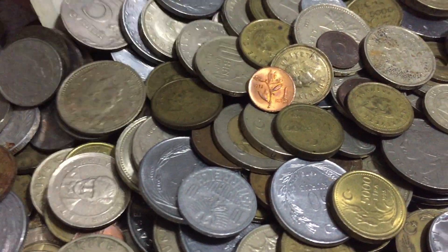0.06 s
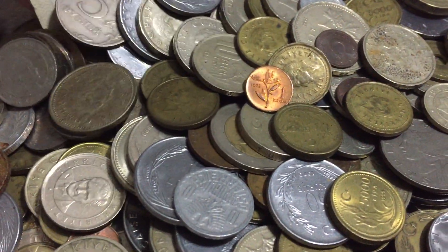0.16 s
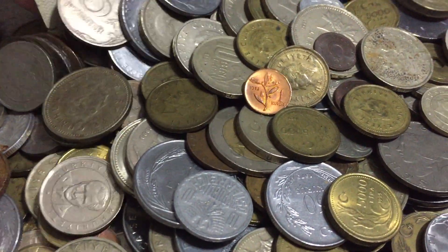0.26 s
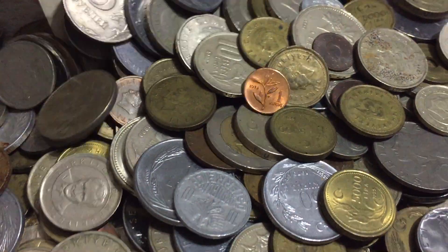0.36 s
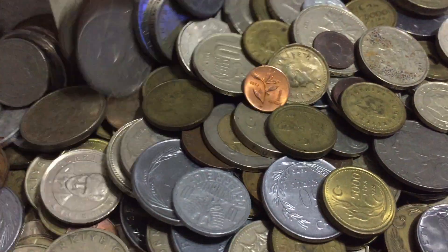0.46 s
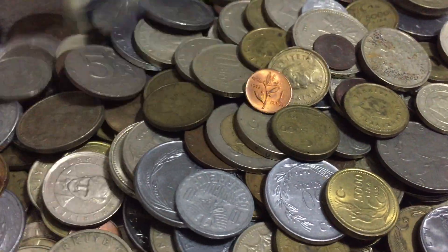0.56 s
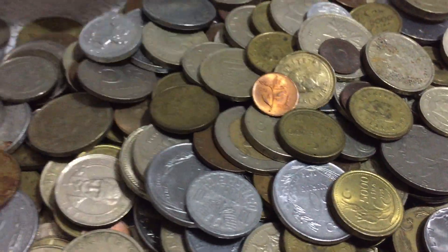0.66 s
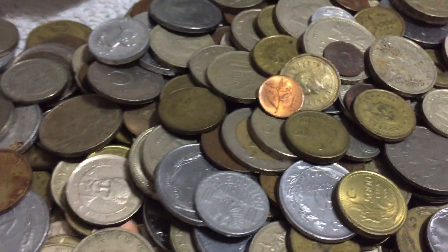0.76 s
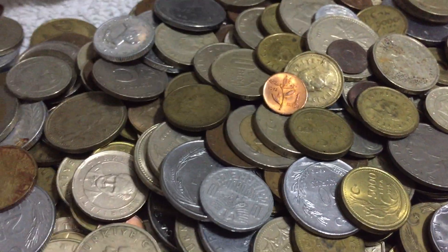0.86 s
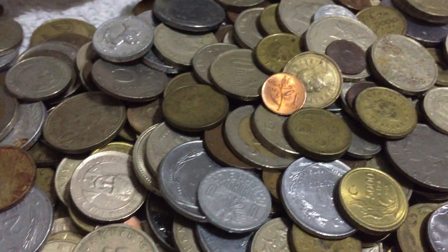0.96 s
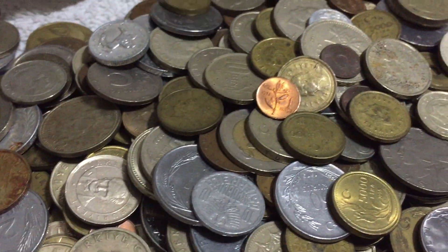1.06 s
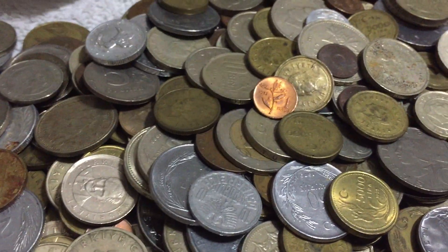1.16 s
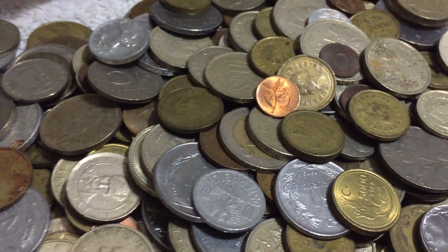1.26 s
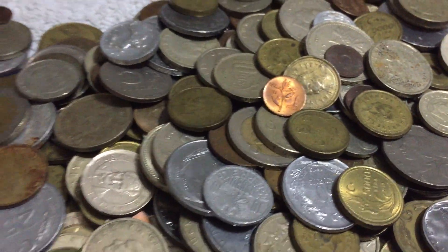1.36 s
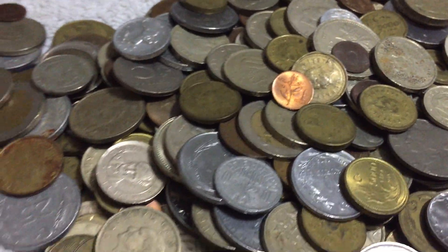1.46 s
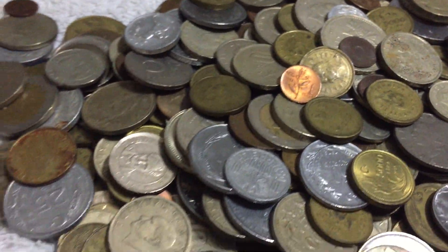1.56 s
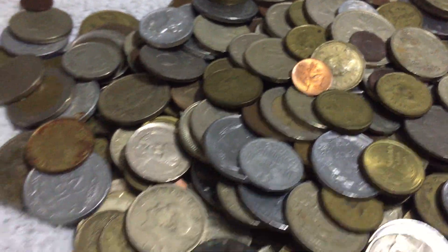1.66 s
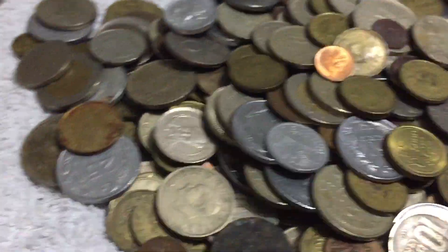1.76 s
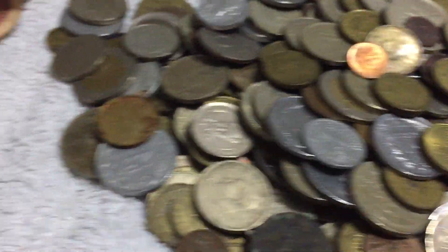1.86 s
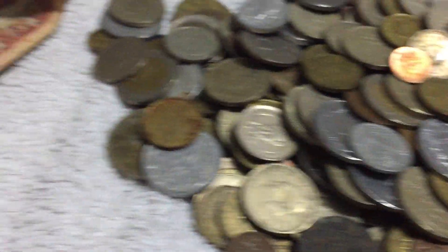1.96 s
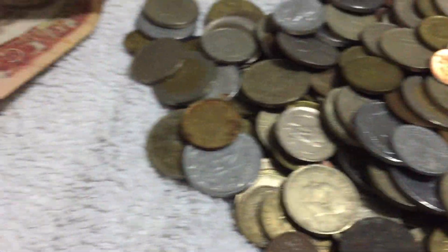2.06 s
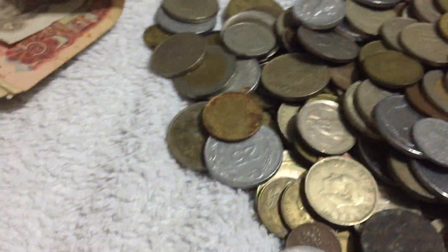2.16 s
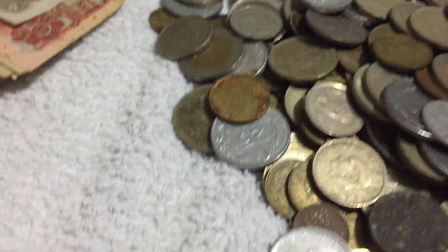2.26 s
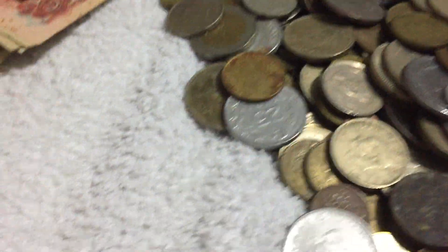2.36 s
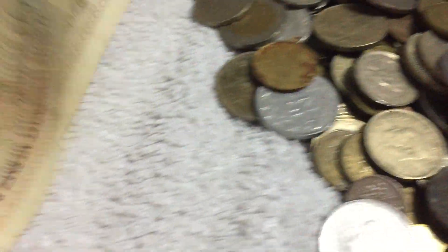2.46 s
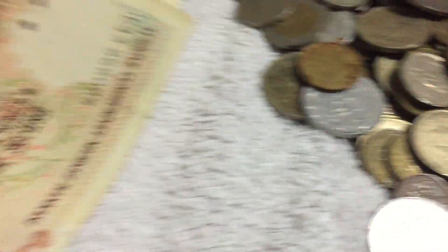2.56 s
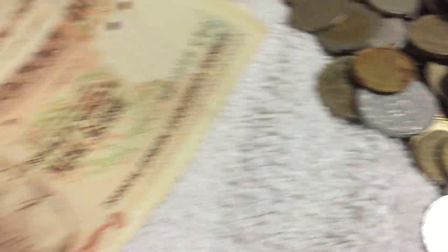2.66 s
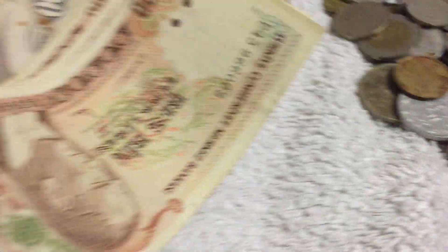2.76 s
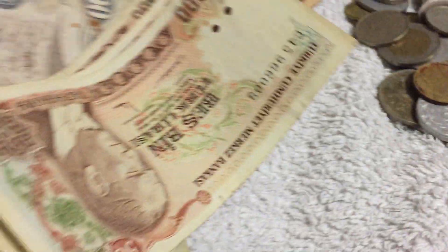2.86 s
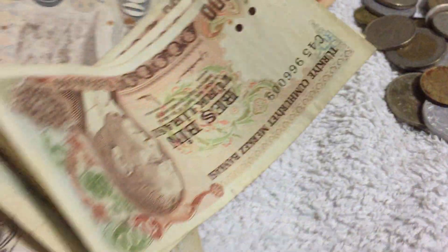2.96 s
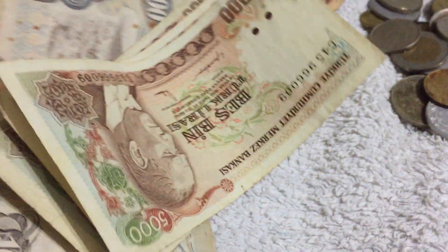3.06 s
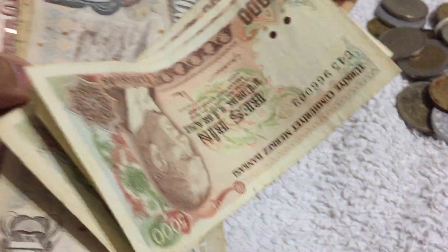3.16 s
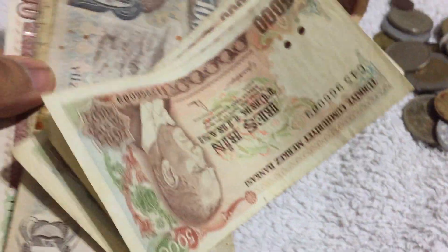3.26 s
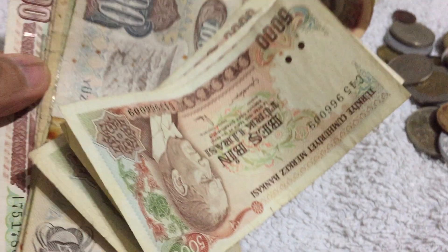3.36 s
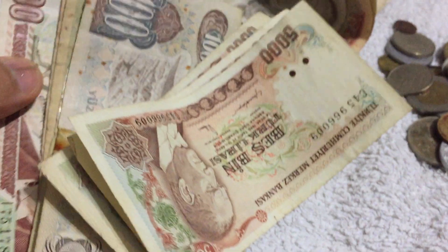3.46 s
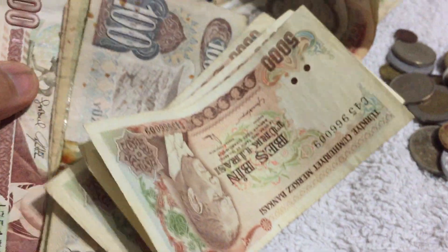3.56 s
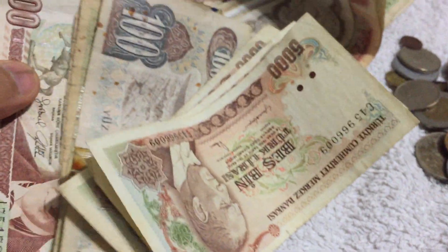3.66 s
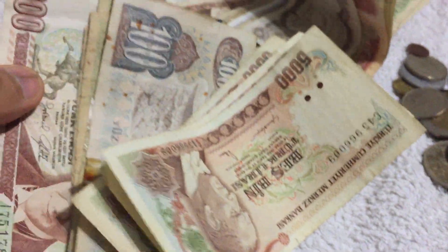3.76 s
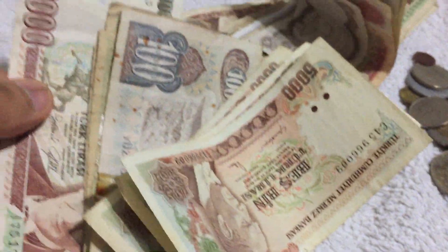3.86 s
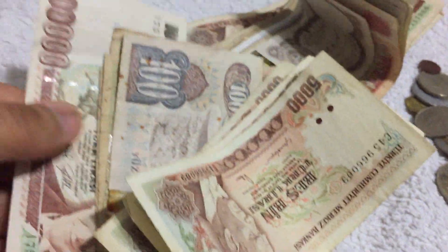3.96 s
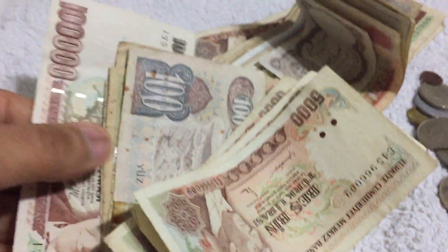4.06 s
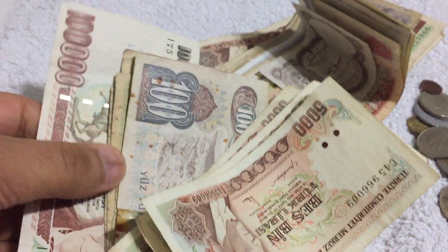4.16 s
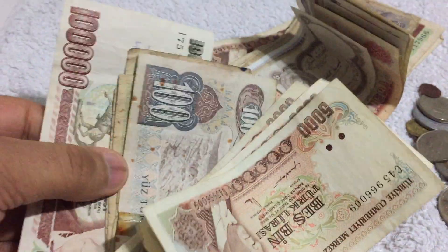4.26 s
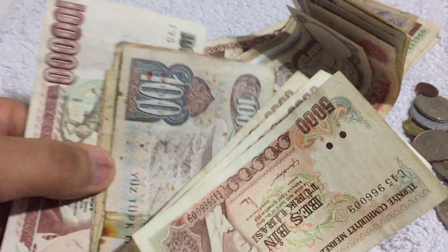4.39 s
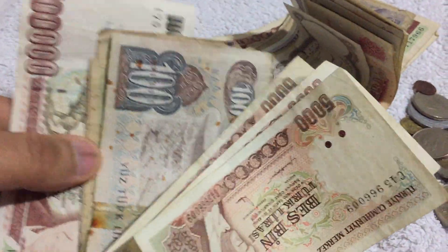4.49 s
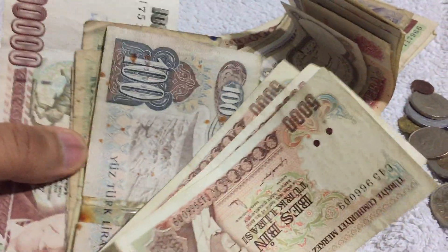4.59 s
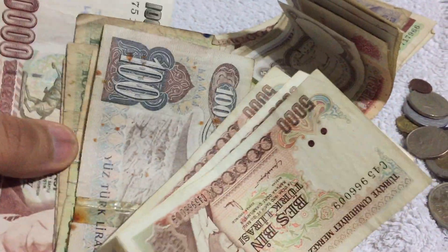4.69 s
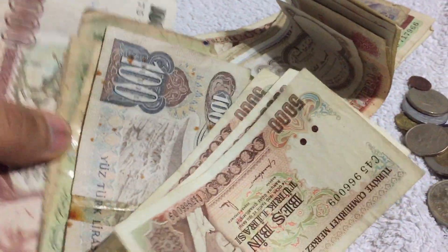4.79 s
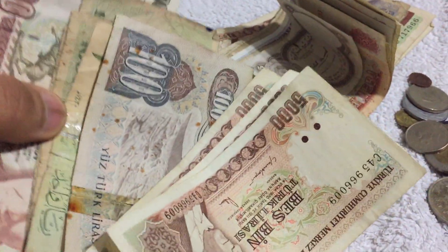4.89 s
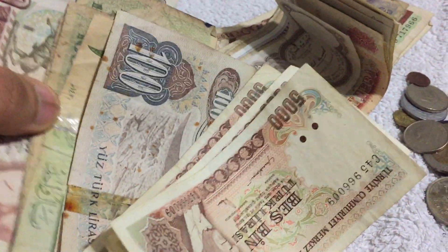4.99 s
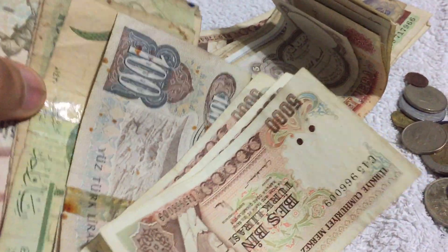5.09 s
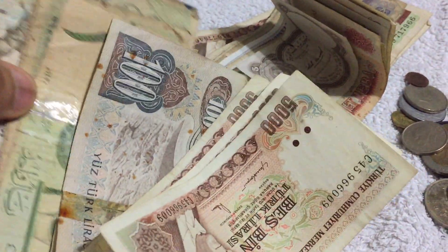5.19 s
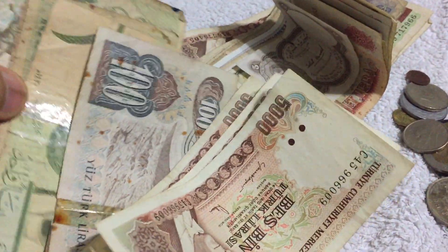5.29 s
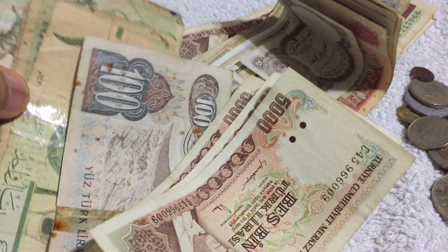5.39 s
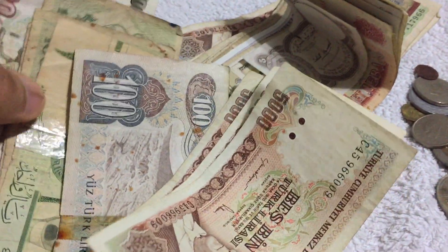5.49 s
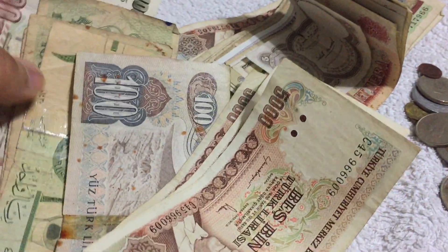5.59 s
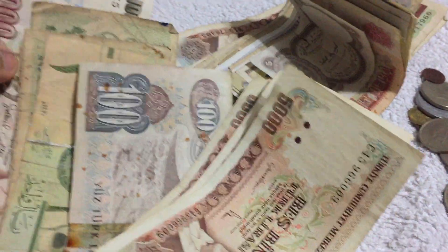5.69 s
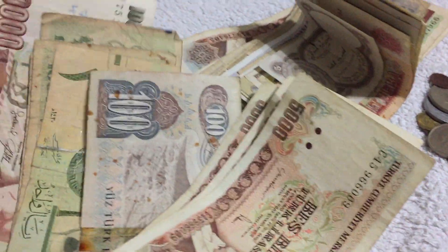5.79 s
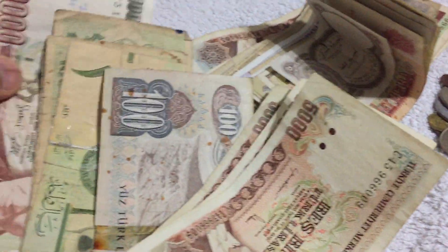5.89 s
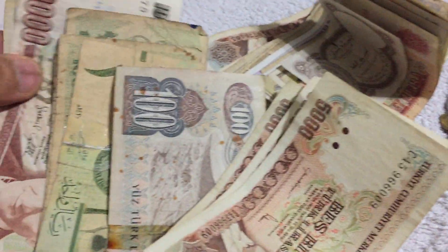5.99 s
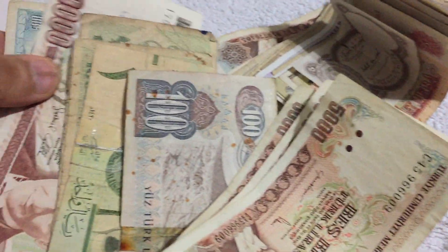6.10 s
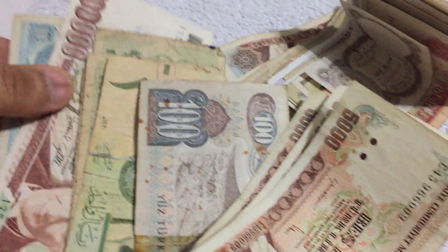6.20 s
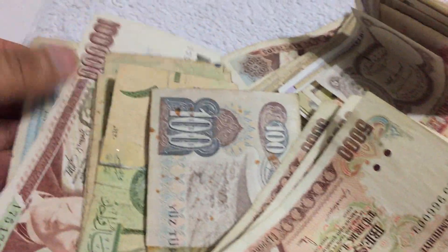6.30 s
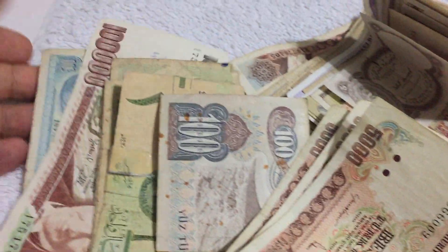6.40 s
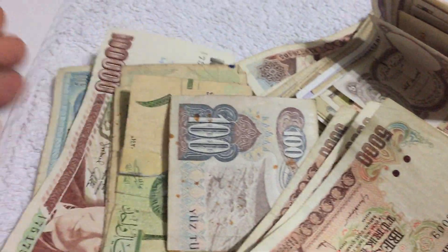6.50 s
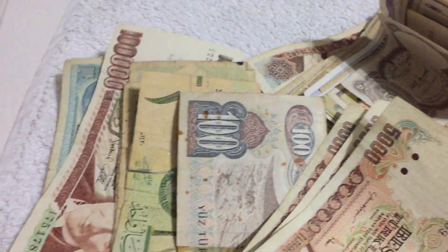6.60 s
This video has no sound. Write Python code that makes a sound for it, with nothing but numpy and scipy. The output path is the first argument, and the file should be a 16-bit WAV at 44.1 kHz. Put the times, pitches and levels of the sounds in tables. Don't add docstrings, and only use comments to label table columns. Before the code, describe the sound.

Close single microphone, small still room with low hiss and a distant machine hum. First a short, loud burst of coins: light raking, a heavy jingling rush, then scattered high pings and a hollow table thump as the last ones settle. A near-silent gap follows, then much quieter handling of old banknotes, rubbing, sliding and crackling irregularly until the end.

```python
import sys
import numpy as np
from scipy import signal
from scipy.fft import rfft, irfft, next_fast_len
from scipy.io import wavfile

SR = 44100
rng = np.random.default_rng(int(sys.argv[2]) if len(sys.argv) > 2 else 0)


def dump(signal):
    limited = np.clip(np.atleast_2d(signal).T, -1, 1)
    pcm = np.round(limited * 32767).astype(np.int16)
    wavfile.write(sys.argv[1], SR, pcm)


def gain_from_db(level_db):
    decades = np.asarray(level_db, float) / 20
    return 10 ** decades


N = 292868
T = np.arange(N) / SR
STEP = 32
CRACK_HZ = 10500

# time_s, scrape_db, depth_db
HAND = [
    (0, -43.5, -4),
    (.13, -47.5, -9),
    (.33, -44.5, -9),
    (.465, -43, -12.5),
    (.485, -30, -8.5),
    (.68, -37, 1),
    (.76, -49, -16),
    (.92, -62.5, -19),
    (1.035, -51.5, -20.5),
]
# time_s, level_db
HOLDING = [
    (1.84, -96.5),
    (1.87, -96),
    (2.28, -68.5),
    (2.31, -75),
    (2.7, -69),
    (3.6, -73),
    (4.1, -73),
    (5.1, -76.5),
    (5.5, -71),
    (6.64, -72.5),
]


def rms_one(x):
    return x / np.sqrt(np.mean(x ** 2) + 1e-20)


def in_time(rows):
    time_s, *columns = np.transpose(rows)
    return [gain_from_db(np.interp(T, time_s, level_db, left=-140, right=-140)) for level_db in columns]


def colour(x, points):
    hz, level_db = np.transpose(points)
    size = next_fast_len(N)
    log_hz = np.log(np.arange(size // 2 + 1) * SR / size + 1)
    gain = gain_from_db(np.interp(log_hz, np.log(hz), level_db))
    return rms_one(irfft(rfft(x, size) * gain, size)[:N])


def split(x, edges_hz):
    size = next_fast_len(N)
    octave = np.log2(np.arange(size // 2 + 1) * SR / size + 1)
    above = [1] + [.5 + .5 * np.tanh(2 * (octave - np.log2(hz))) for hz in edges_hz] + [0]
    spectrum = rfft(x, size)
    return [rms_one(irfft(spectrum * (a - b), size)[:N]) for a, b in zip(above, above[1:])]


def band(x, low_hz, high_hz):
    sos = signal.butter(2, [low_hz, high_hz], "band", fs=SR, output="sos")
    return rms_one(signal.sosfilt(sos, x))


def resonance(x, hz, width_hz):
    r = np.exp(-np.pi * width_hz / SR)
    top = [(1 - r * r) / 2, 0, (r * r - 1) / 2]
    return signal.lfilter(top, [1, -2 * r * np.cos(2 * np.pi * hz / SR), r * r], x)


def thin(x, hz):
    r = np.exp(-np.pi * hz / 2 / SR)
    return signal.lfilter([r * r, -2 * r * r, r * r], [1, -2 * r, r * r], x)


def ring(clicks, hz, t60):
    r = gain_from_db(-60 / (t60 * SR))
    w = 2 * np.pi * min(hz, .45 * SR) / SR
    return signal.lfilter([0, np.sin(w)], [1, -2 * r * np.cos(w), r * r], clicks + 1e-18)


def drift(rate):
    count = int(7 * rate) + 2
    return rms_one(np.interp(T * rate, np.arange(count), rng.standard_normal(count)))


def grit(per_s, spread_db):
    sizes = gain_from_db(spread_db * np.minimum(rng.exponential(1, N), 4)) * rng.choice([-1, 1], N)
    return rms_one(sizes * (rng.random(N) < per_s / SR))


def bounces(per_s, t60):
    hits = (rng.random(N) < per_s / SR) * rng.uniform(0.148, 1, N)
    return rms_one(signal.lfilter([1], [1, -gain_from_db(-60 / (t60 * SR))], hits))


def dying(start, level_db, t60, stop=99):
    age = T - start
    return (age >= 0) * gain_from_db(level_db - 60 * np.maximum(age, 0) / t60 - 3000 * np.maximum(T - stop, 0))


def fall(level_db, t60):
    return gain_from_db(level_db - 60 * T[:SR // 4] / max(t60, .004))


def hump(start, hold, rise, drop, power=0.83):
    coarse_s = T[::STEP]
    away = np.maximum(start - coarse_s, 0) / rise + np.maximum(coarse_s - start - hold, 0) / drop
    return gain_from_db(-9 * np.minimum(away, 12) ** power)


def fine(coarse):
    return np.interp(T, T[::STEP], coarse)


def add(out, s, part):
    i = round(s * SR)
    out[i:i + len(part)] += part[:N - i]


def room():
    # pitch_hz, level_db
    air_spectrum = [(15, -38), (25, -7), (74, -6), (232, -4), (349, -4), (510, -13.5), (4130, -22.5),
                    (10400, -25.5), (12200, -26), (15200, -28), (16500, -46)]
    # pitch_hz, level_db
    hum_lines = [(344, -77), (392.5, -80.5)]
    # time_s, level_db
    auto_gain = [
        (0, -0.5),
        (1.5, -2.5),
        (1.85, -3),
        (2.3, -3.5),
        (6.64, -5.5),
    ]
    sound = gain_from_db(-66.5) * colour(rng.standard_normal(N), air_spectrum)
    for hz, db in hum_lines:
        level = gain_from_db(db + 6 + 1.5 * drift(6))
        sound = sound + level * np.sin(2 * np.pi * (hz * T + .03 * drift(5)))
    return sound * in_time(auto_gain)[0]


def stirring():
    # time_s, rumble_db
    shoves = [
        (.18, -54),
        (.49, -52.5),
        (0.663, -33.5),
        (.73, -51),
        (0.874, -46.5),
    ]
    scrape, depth = in_time(HAND)
    depth = np.maximum(depth, .01)
    slide = gain_from_db(-12.5) * scrape * depth ** -1.47
    rumble = gain_from_db(-19) * scrape * depth ** 0.451
    rumble = rumble + fine(sum(gain_from_db(db) * hump(s, 0, rise=0.018, drop=0.025) for s, db in shoves))
    creep = fine(gain_from_db(-47) * hump(1.1, hold=0.275, rise=0.043, drop=0.027))
    return slide + creep, scrape, scrape * depth, rumble


def clinks(contacts):
    # start_s, rattle_db (rms), ring_hz, rattle_t60_s
    raked = [(.001, -29, 11440, 0.1), (.0252, -40, 11200, 0.26), (.0375, -31, 10000, .06),
             (0.0467, -30.5, 8300, 0.067), (0.0688, -35.5, 12800, 0.031), (0.1051, -40.5, 6260, 0.046),
             (0.18, -39.5, 9900, 0.025), (0.1954, -40, 12800, 0.17), (0.2152, -30, 10900, 0.058),
             (0.2255, -25.5, 11000, 0.0161), (.2393, -44.5, 13200, 0.083), (.2535, -34, 8500, .043),
             (.2695, -49, 6450, .12), (0.297, -43, 7500, 0.015), (.3044, -40.5, 6600, .02),
             (0.309, -43, 6600, 0.06), (.3258, -32.5, 13700, 0.062), (.3359, -34.5, 13900, .085),
             (.3557, -38.5, 13100, 0.051), (.3874, -45, 5900, 0.06), (0.3964, -41, 6460, .037),
             (0.4103, -36, 13600, 0.072), (.4444, -32.5, 11430, 0.11), (.4608, -38.5, 6200, 0.36)]
    spilled = [(0.4787, -21.5, 9200, 0.14), (.4825, -18, 12000, .07), (0.4932, -30.5, 14700, 0.14),
               (.5113, -28, 13040, 0.3012), (0.523, -20, 14300, .3), (0.57, -19.5, 13800, 0.069),
               (.581, -20.5, 13800, .3), (0.6211, -22, 9500, .2), (0.636, -16.5, 11300, .2),
               (.6476, -18.5, 14700, .2), (.662, -15, 9040, .2), (0.6682, -15, 13820, .12),
               (.6755, -15.5, 11130, .11), (0.6855, -18.5, 10910, .088), (.6905, -25.5, 14000, .3),
               (0.7187, -21, 10130, .12), (0.7384, -23.5, 9700, .064), (.7712, -40.5, 9900, .059),
               (.7888, -45.5, 12900, .109)]
    tumbled = [(.8163, -46.5, 12000, .03), (0.839, -48.5, 14300, .12), (0.849, -39.5, 13000, 0.18),
               (0.861, -31.5, 13300, 0.076), (.868, -27.5, 12500, .12), (0.8776, -31, 13100, .17),
               (0.906, -45, 10600, .12), (1.032, -45.5, 8700, 0.13), (1.05, -53.5, 4450, 0.09),
               (1.072, -53, 5900, 0.1), (1.0852, -24.5, 12000, 0.1), (1.1036, -23, 11600, 0.1),
               (1.1161, -27.5, 13900, 0.094), (1.1336, -23.5, 11600, 0.049), (1.1434, -31, 10400, 0.079),
               (1.1836, -34.5, 9300, 0.094), (1.1925, -23.5, 9930, 0.081), (1.209, -34, 11400, .12),
               (1.2359, -36.5, 10200, 0.17), (1.26, -29, 11200, 0.066), (1.2692, -36, 11000, 0.12),
               (1.2879, -34, 11500, .12), (1.296, -36, 11200, .083), (1.3453, -37, 10600, .12),
               (1.3518, -36.5, 10100, 0.089), (1.372, -47, 11440, 0.15)]
    rests = [0.056, .079, 0.107, .233, 0.26, .276, .361, .403, 0.492, .689, 0.757, .803, .822, .914, 1.04,
             1.155, 1.205, 1.282, 1.305, 1.381]
    force, thump, chimes = np.zeros((3, N))
    hand_s, _, hand_depth_db = np.transpose(HAND)
    for s, db, hz, t60 in raked + spilled + tumbled:
        clatter_db = -18.5 + 0.57 * np.interp(s, hand_s, hand_depth_db)
        start = round(s * SR)
        span = slice(start, start + SR // 4)
        rest = min([r for r in rests if r > s] + [2])
        moving = gain_from_db(-2500 * np.maximum(T[span] - rest, 0))
        fresh = np.clip(1 - force[span][0] / gain_from_db(db - 8.0), 0, 1)
        lasting = t60 * (1.8 if t60 > .1 else 1.0)
        force[span] = moving * fall(db - 1.0, lasting) + fresh * fall(db - 4.0, 0.004)
        thump[span] = moving * fall(db + clatter_db, 0.41 * t60)
        rubbed = moving * fall(db - 20.5, 0.49 * t60) * contacts[span]
        add(chimes, s, ring(rubbed, hz, .02))
        add(chimes, s, moving * fall(db - 5, 0.67 * t60) * resonance(contacts[span], hz, hz / 3.7))
        first_touch = ring(T[:400] == 0, hz, 0.0056)
        add(chimes, s, fresh * gain_from_db(db - 5) * first_touch)
    return force, thump, chimes


def heap(contacts):
    dealt = rng.integers(0, 48, N)
    pitches = np.linspace(5000, 15800, 48) + rng.normal(0, 70, 48)
    return rms_one(sum(ring(contacts * (dealt == k), hz, 0.026) for k, hz in enumerate(pitches)))


def coins(slide, scrape, clatter):
    # pitch_hz, level_db (per Hz)
    coin_spectrum = [(210, -33.5), (350, -16.5), (432, -21), (625, -6.5), (906, -11), (1700, -6),
                     (2000, -15), (2670, -10), (2990, -13), (5340, -12.5), (8120, -7.5), (10500, -7.5),
                     (14300, -5.5), (15700, -7), (16500, -26.5)]
    # time_s, level_db
    flat_knocks = [
        (0.052, -51),
        (0.3559, -37),
        (0.493, -28),
        (0.5262, -32),
        (.964, -53),
    ]
    rim_hz = 3500
    contacts = 0.62 * grit(5000, 2.6) + 0.66 * rng.standard_normal(N)
    force, thump, chimes = clinks(contacts)
    thuds = np.zeros(N)
    for s, db in flat_knocks:
        add(thuds, s, fall(db, 0.029))
    deep, low, mid, high = split(colour(contacts, coin_spectrum), [900, 2500, 7000])
    knocks = thuds * rms_one(deep + low)
    heavy = np.clip(scrape / gain_from_db(-38), 0.14, 1.4)
    low = 0.94 * (low + heavy * deep)
    raked = 0.75 * mid + 0.25 * rms_one(resonance(mid, rim_hz, 570))
    force = np.maximum(force, 0.31 * slide)
    crowd = np.clip(force / 0.05, .17, .65)
    snaps, jolts = touches(contacts)
    lumps = crowd + (1 - crowd) * (0.46 * bounces(380, 0.012) + 0.89 * jolts)
    force = force * lumps
    rung = colour(heap(contacts * force), coin_spectrum[6:]) * .62 * np.sqrt(np.mean(force ** 2))
    rattle = thin(0.7 * force * high + 0.18 * force * mid, CRACK_HZ / 2)
    scraping = 0.77 * scrape * lumps * raked
    clattering = np.maximum(thump, 0.63 * clatter * gain_from_db(1.8 * drift(46))) * low
    return rattle + scraping + knocks + clattering + rung + thin(chimes, rim_hz) + snaps


def singing():
    # struck_s, pitch_hz, level_db, t60_s, caught_s
    free_coins = [(.004, 11380, -37, .1, .012), (.024, 11380, -38, .15, .045), (.198, 13050, -43, .2, .213),
                  (.647, 14600, -19, .08, .657), (.679, 11150, -20, .1, .689), (.855, 13300, -31, .1, .864),
                  (.9, 13400, -51, .15, .932), (.77, 10330, -53, .6, .85), (1.062, 11725, -63, .5, 1.085),
                  (.083, 13450, -60, .2, .105), (.327, 13010, -35, .15, .374),
                  (.872, 10330, -35, .16, .945), (.874, 13370, -28, .08, .892),
                  (.558, 12400, -22, .1, .567), (.569, 7900, -24, .1, .582), (.633, 11300, -25, .12, .65),
                  (.585, 14800, -24, .06, .595), (.5685, 13950, -14, .05, .578), (.705, 9700, -31, .3, .75),
                  (1.085, 11725, -16.5, .22, 1.106), (1.106, 11780, -28, .08, 1.116),
                  (1.15, 11060, -46, .4, 1.19), (1.192, 11060, -35, .45, 1.36),
                  (1.2, 11185, -38, .4, 1.285), (1.287, 11185, -37, .18, 1.345),
                  (1.346, 11185, -43, .3, 1.375), (1.28, 10330, -54, .3, 1.34),
                  (1.346, 10330, -48, .27, 1.5), (1.375, 11185, -40, .3, 1.53),
                  (1.53, 11185, -76, .25, 1.6)]
    out = np.zeros(N)
    for s, hz, db, t60, caught in free_coins:
        out += dying(s, db, t60, caught) * np.sin(2 * np.pi * hz * (T - s))
    return out


def touches(contacts):
    # start_s, peak_db, pitch_hz
    raked = [(0.0183, -43, 11300.0), (0.0284, -38, 11200), (0.036, -36, 14800), (0.049, -29.5, 9100),
             (0.0516, -43, 11300), (0.0655, -33, 7800), (0.0694, -26, 12800), (0.076, -31, 9100),
             (0.0934, -34, 1580), (0.0994, -34, 1410), (0.1036, -30.5, 7200), (0.132, -39.5, 11000),
             (0.139, -45, 3700.0), (0.151, -32, 1160), (0.157, -40, 10700), (0.1729, -36, 2550),
             (0.176, -41, 4770), (0.1813, -34.0, 9500), (0.1875, -37, 4570), (0.1968, -29, 9500.0),
             (0.2058, -32, 9700), (0.21, -28.5, 3140), (0.2144, -13.5, 11350), (0.2264, -25.0, 8300),
             (0.2397, -32.0, 13600), (0.2484, -32.5, 3870), (0.2545, -19, 6780), (0.27, -28, 3500),
             (0.2796, -40.5, 3420), (0.2861, -36, 3320), (0.288, -38.5, 3200.0), (0.3151, -41, 6300),
             (0.3212, -29, 3120), (0.326, -37, 13000), (0.331, -37, 12900.0), (0.337, -23.5, 6150),
             (0.3562, -27.5, 1680), (0.3806, -50, 3420), (0.3834, -38, 1190), (0.3884, -34, 6100),
             (0.412, -36, 5430), (0.4193, -40.5, 8000.0), (0.4331, -30, 6150), (0.444, -29, 11200),
             (0.4617, -27.5, 4330)]
    spilled = [(0.484, -17.5, 14350), (0.4937, -16, 1169), (0.5026, -25, 14200.0), (0.5096, -24.0, 6160),
               (0.5134, -19, 11960), (0.528, -12, 7030), (0.537, -16, 8250), (0.5417, -16.5, 8210),
               (0.5519, -18.0, 8730), (0.5558, -18.5, 12400.0), (0.5716, -13, 13580), (0.578, -13.5, 8280),
               (0.5863, -16, 14800.0), (0.5921, -16.5, 13700.0), (0.5976, -15.5, 12580),
               (0.6023, -18, 13600.0), (0.6066, -17.0, 9600.0), (0.62, -15.5, 7960), (0.6288, -20.5, 11870),
               (0.6388, -18.5, 11340), (0.647, -11.5, 14530), (0.6515, -13.5, 14430), (0.6586, -15, 9900.0),
               (0.6664, -12.5, 9280), (0.671, -11, 14200.0), (0.6793, -7.5, 10900.0), (0.684, -10, 11200.0),
               (0.7034, -17.0, 13800.0), (0.7083, -18, 13600.0), (0.714, -20.0, 9440), (0.7204, -12, 8670),
               (0.7276, -18.0, 13990), (0.7314, -18.5, 9403), (0.739, -16, 13730), (0.7439, -27, 13780),
               (0.749, -31, 13530), (0.7567, -37.5, 8900.0), (0.771, -31.0, 13450), (0.777, -45, 9600),
               (0.7898, -40, 12700.0)]
    tumbled = [(0.8364, -52, 12800.0), (0.844, -43, 14800.0), (0.852, -42, 13000.0), (0.86, -32, 13400),
               (0.8652, -25, 14400), (0.8682, -18.5, 10400), (0.8805, -19, 13200), (0.9044, -44, 10200.0),
               (0.907, -32, 9300), (0.9617, -52, 4030), (0.976, -50, 12200), (0.9917, -43, 9500),
               (0.9999, -37, 9200), (1.0133, -36, 9800.0), (1.032, -37, 8900), (1.1129, -14, 11000),
               (1.1436, -16, 12900), (1.1522, -35.5, 10000.0), (1.161, -28, 10700), (1.166, -30, 10100),
               (1.1945, -17.5, 9040), (1.2082, -19, 11100.0), (1.2217, -36.5, 10900),
               (1.2306, -34.0, 11200.0), (1.2377, -35, 11300.0), (1.2485, -40, 11100), (1.2615, -18, 14500),
               (1.2692, -26.5, 13000), (1.2971, -43, 14200), (1.3569, -22, 8900), (1.3616, -36, 11200),
               (1.3691, -43, 11000), ]
    # middle_s, peak_db
    cracks = [(.1042, -31), (.2152, -15), (.2984, -33), (.3047, -30), (.3105, -24), (.3572, -27),
              (.3941, -30), (.4003, -29), (.6775, -8), (.8169, -29), (.8687, -19), (.8749, -17),
              (1.0832, -30), (1.0853, -14), (1.1338, -13), (1.1846, -26), (1.1885, -24), (1.1937, -10),
              (1.1962, -15), (1.248, -31), (1.2604, -21), (1.2689, -17), (1.2881, -23), (1.3452, -23),
              (1.349, -23), (1.352, -26), (1.3548, -26)]
    t60 = .007
    snaps, jolts = np.zeros((2, N))
    rims = raked + spilled + tumbled
    for s, db, hz in rims:
        i = round(s * SR)
        rough, following = contacts[i:i + 800], contacts[i + 1:i + 801]
        burst = (1 + .7 * rough) * fall(0, t60)[:800] * np.cos(2 * np.pi * hz * T[:800])
        edge = (following - .7 * rough) * fall(0, .6 * t60)[:800]
        snap = thin(resonance(burst, hz, hz / 3.5) + .55 * edge, hz / 2)
        add(snaps, s, gain_from_db(db - 1.5) * snap / np.abs(snap).max())
    age = T[:40] - T[20]
    for s, db in cracks:
        crack = np.exp(-(age / .00009) ** 2) * np.cos(2 * np.pi * CRACK_HZ * age)
        add(snaps, s - T[20], gain_from_db(db) * crack)
    for s, *_ in sorted(rims + cracks):
        i = round(s * SR)
        jolts[i:i + SR // 4] = fall(0, 0.02196)
    return snaps, jolts


def table(rumble):
    # pitch_hz, level_db, t60_s
    board_modes = [(138.5, -8.5, 0.7), (184, -11, 0.98), (217.8, -2, 0.71), (272.8, -13, 0.72),
                   (349, -8.5, 0.5), (480, -12.5, 0.058), (586, -14, 0.25), (780, -22, 0.2)]
    knock_s = 1.048
    push = np.exp(-((T - knock_s) / 0.00049) ** 2) / (0.00053 * SR)
    shake = rng.standard_normal(N)
    knock = np.zeros(N)
    for k, (hz, db, t60) in enumerate(board_modes):
        knock += (-1) ** k * gain_from_db(db + 2.5 * drift(29.9)) * ring(push, hz, 0.65 * t60)
    knock = knock - gain_from_db(12.5) * ring(push, 209, 0.06)
    knock = knock - gain_from_db(-30.0) * ring(push, 360, 0.03) + gain_from_db(4.0) * ring(push, 840, 0.027)
    tail = gain_from_db(-63.5) * band(dying(knock_s, 0, 0.24) * shake, 258, 443)
    tail = tail + gain_from_db(-61.5) * band(dying(knock_s + 0.038, 0, 0.31) * shake, 110, 170)
    shaken = rms_one(sum(gain_from_db(db) * ring(shake, hz, 0.47 * t60) for hz, db, t60 in board_modes))
    shaken = shaken + 4.5 * band(shake, 50, 231.9)
    on_heap = np.where(T < knock_s - .03, 1, 0)
    return gain_from_db(-34) * knock + tail + rumble * on_heap * rms_one(shaken)


def paper():
    # pitch_hz, level_db (per Hz)
    paper_spectrum = [(35, -26), (60, -24), (318, 19), (342, -30), (464, 6.5), (1190, 7), (1940, 2.5),
                      (4030, 0.5), (15000, -16.5), (16500, -16)]
    # pitch_hz, width_hz, share (0-1)
    curl_modes = [(1460, 900, 0.4), (4400, 700, 0.12)]
    # start_s, peak_db, pitch_hz, t60_s
    creases = [(1.839, -54, 5350, 0.019), (2.182, -37, 5210, 0.0094), (2.348, -43, 3590, 0.012),
               (2.585, -32.5, 1190, 0.044), (3.157, -37, 7320, 0.025), (3.171, -20, 2550, 0.021),
               (4.348, -46.5, 4390, 0.0168), (4.409, -49, 1670, 0.015), (4.424, -27, 1160, 0.013),
               (4.919, -43.5, 3750, 0.022), (5.148, -52, 8900, 0.0061), (5.586, -28.5, 1650, 0.053),
               (5.67, -40.5, 2700, 0.018), (5.924, -33.5, 1660, 0.059), (6.013, -45, 2580, 0.011),
               (6.094, -40, 1220, 0.013), (6.553, -39, 2510, .01)]
    uneven = 1.2 + 0.45 * np.minimum(bounces(250, 0.012), 2)
    fibres = colour(grit(6000, 1.9), paper_spectrum) * uneven
    parts = split(fibres, [700, 2200, 7000])
    for k, (hz, width, share) in enumerate(curl_modes, start=1):
        curled = rms_one(resonance(resonance(fibres, hz, width), hz, width))
        parts[k] = np.where(T > 5.84, share * curled + (1 - share) * parts[k], parts[k])
    levels, curls = strokes(fibres)
    ticks = gain_from_db(-88) * band(grit(14, 2.5), 2500, 5500)
    out = curls + ticks * (T > HOLDING[0][0])
    for level, part in zip(levels, parts):
        out = out + level * part * gain_from_db(1.7 * drift(30))
    for s, db, hz, t60 in creases:
        burst = fall(db - 21.0, t60) * rng.standard_normal(SR // 4)
        crease = signal.butter(1, [hz / 2.74, hz * 1.7], "band", fs=SR, output="sos")
        dull = signal.sosfilt(crease, burst + 1e-18)
        add(out, s, 0.36 * np.diff(burst, prepend=0) + 3.54 * dull)
    return out


def strokes(fibres):
    # middle_s, half_length_s, level_db, pitch_hz
    slides = [(2.038, 0.085, -59, 3240), (2.205, 0.027, -64.5, 6030), (2.26, 0.027, -67, 2510),
              (2.417, 0.015, -57, 5950), (2.476, 0.031, -57, 1456), (2.569, 0.037, -57.5, 1290),
              (2.58, 0.023, -50, 5560), (2.627, 0.027, -61, 4510), (2.972, 0.031, -57.5, 5600),
              (3.027, 0.085, -60.5, 6740), (3.442, 0.1, -68, 4160), (4.356, 0.017, -70, 5000),
              (4.458, 0.012, -64.5, 2500), (4.614, 0.026, -67.5, 4010), (4.687, 0.077, -70, 4080),
              (4.923, 0.04, -64, 6900), (5.154, 0.026, -61, 8680), (5.233, .015, -69.5, 4070),
              (5.307, 0.018, -61.5, 11500), (5.438, 0.016, -60.5, 12440), (5.579, 0.032, -59, 3900),
              (5.742, 0.032, -64, 4000), (5.923, 0.042, -63, 4070), (5.923, 0.012, -55.5, 6750),
              (6.217, 0.03, -53, 1625), (6.3, 0.0095, -68.5, 1510), (6.433, 0.093, -69.5, 1586),
              (6.545, 0.026, -62, 2410), (6.554, 0.08, -70, 6300)]
    # start_s, hold_s, level_db, pitch_hz
    pulls = [
        (1.874, 0.033, -68, 3920),
        (1.973, 0.26, -68, 620),
        (2.346, 0.083, -51.5, 3340),
        (3.17, 0.017, -57, 3020),
        (4.411, 0.0091, -59, 1530),
        (5.85, 0.16, -66, 1403),
        (6.013, 0.05, -54.5, 4200),
        (6.015, 0.072, -54.5, 1190),
        (6.034, 0.052, -54, 1740),
        (6.113, 0.11, -57.5, 1400),
    ]
    layer_hz = np.array([400, 1300, 4000, 10000])
    layer_db = np.array([-10.5, -4, -3, -2.5])
    shapes = [(hump(s, 0, half, half, power=1.22), s, db, hz) for s, half, db, hz in slides]
    shapes += [(hump(s, hold, rise=0.0049, drop=0.026), s, db, hz) for s, hold, db, hz in pulls]
    curls = np.zeros(N)
    for shape, s, db, hz in shapes:
        start = round(s * SR)
        span = slice(start - SR // 4, start + SR // 2)
        width = hz / 2.13
        sung = rms_one(resonance(resonance(fibres[span], hz, width), hz, width))
        curls[span] += gain_from_db(db - 9.5) * np.interp(T[span], T[::STEP], shape) * sung
    shapes += [(in_time(HOLDING)[0][::STEP], 0, 0, 2880)]
    power = 0
    for shape, _, db, hz in shapes:
        off_pitch_db = 1.5 * np.log2(layer_hz / hz) ** 2
        power = power + np.outer(gain_from_db(db + layer_db - off_pitch_db), shape) ** 2
    return [fine(layer) for layer in np.sqrt(power)], curls


def presses():
    # time_s, level_db
    bumps = [
        (3.169, -66.5),
        (5.95, -69),
        (6.45, -72.5),
        (6.57, -73.5),
    ]
    level = fine(sum(gain_from_db(db) * hump(s, 0, rise=0.13, drop=0.1) for s, db in bumps))
    return band(rng.standard_normal(N), 25, 122) * level


def scene():
    slide, scrape, clatter, rumble = stirring()
    money = coins(slide, scrape, clatter) + singing() + paper()
    return (room() + money + table(rumble) + presses())[None]


def top_cut(x):
    return signal.sosfilt(signal.butter(12, 16840, fs=SR, output="sos"), x)


def record(dry):
    x = signal.sosfilt(signal.butter(2, 55, "high", fs=SR, output="sos"), dry)
    x = signal.sosfilt(signal.cheby2(12, 25, 16150, fs=SR, output="sos"), x)
    x = x - .4 * resonance(x, hz=10400, width_hz=500)
    return top_cut(x)


dry = scene()
out = record(dry)
dump(out)
```